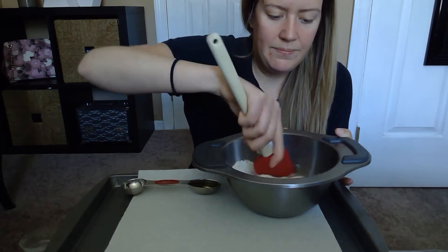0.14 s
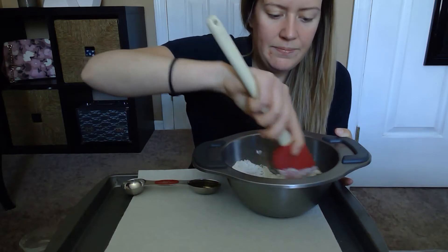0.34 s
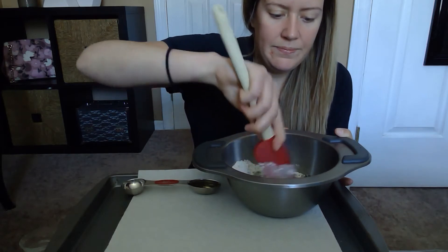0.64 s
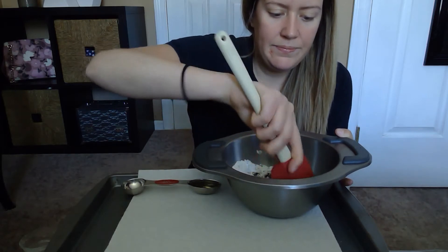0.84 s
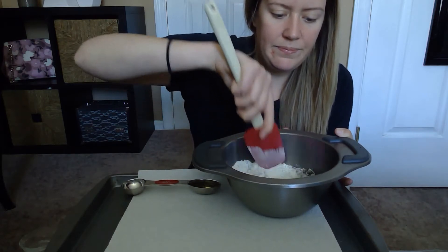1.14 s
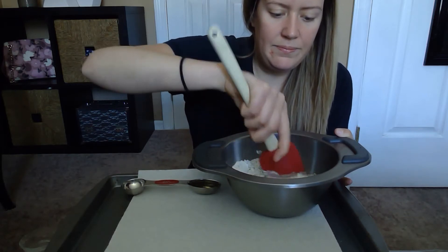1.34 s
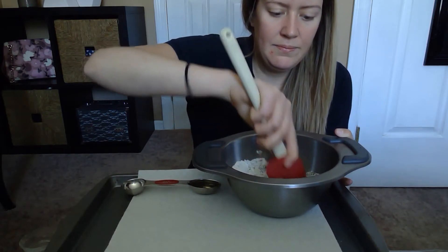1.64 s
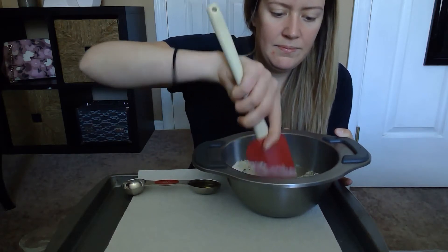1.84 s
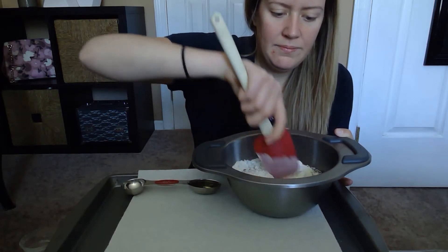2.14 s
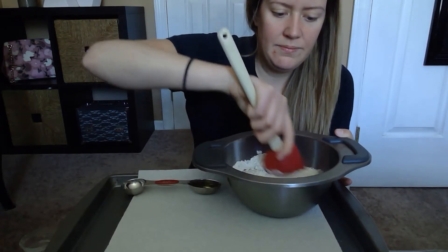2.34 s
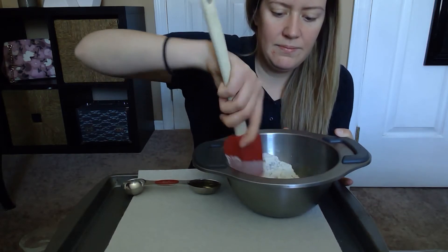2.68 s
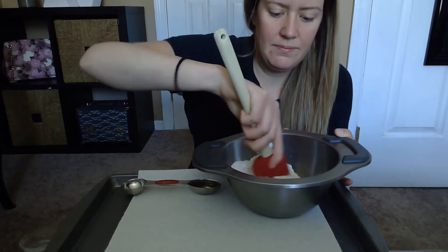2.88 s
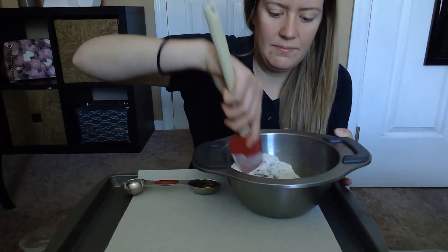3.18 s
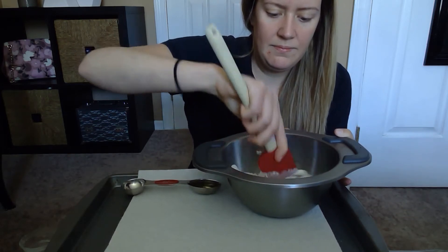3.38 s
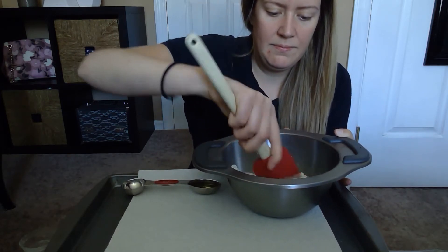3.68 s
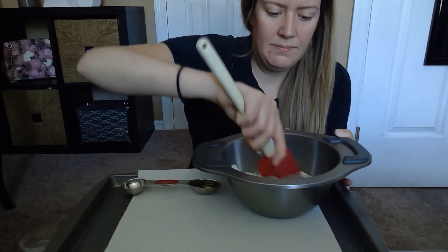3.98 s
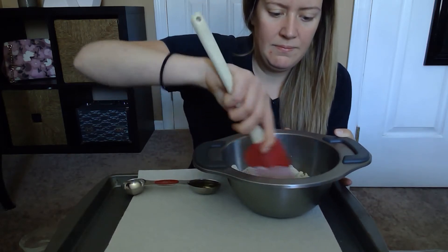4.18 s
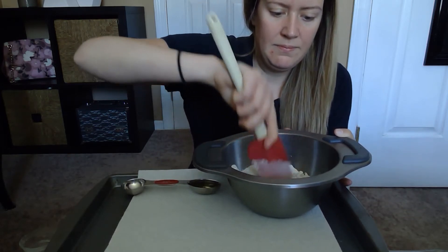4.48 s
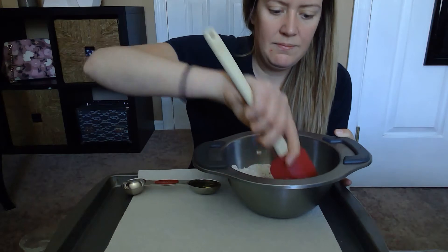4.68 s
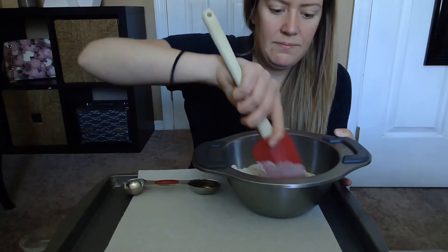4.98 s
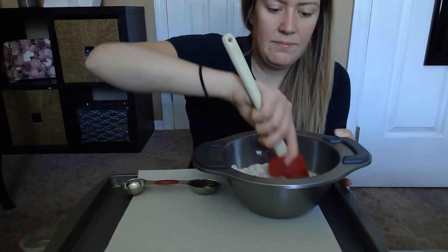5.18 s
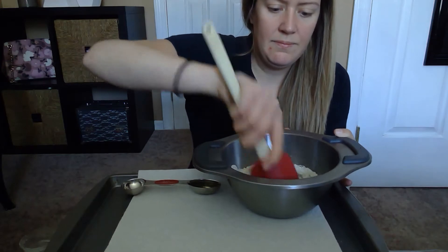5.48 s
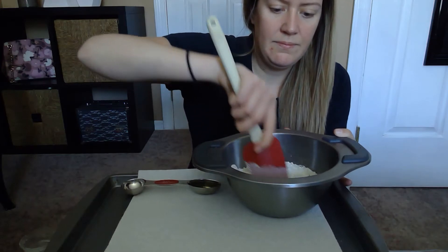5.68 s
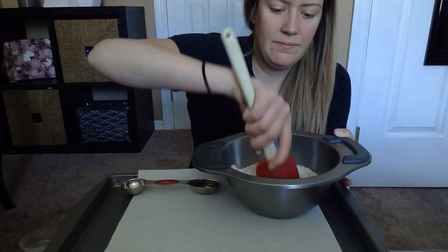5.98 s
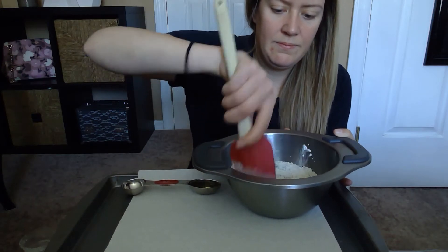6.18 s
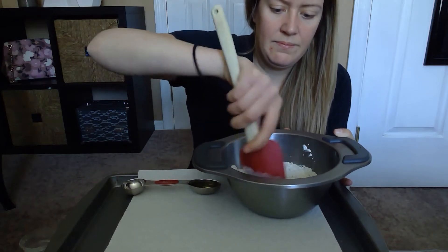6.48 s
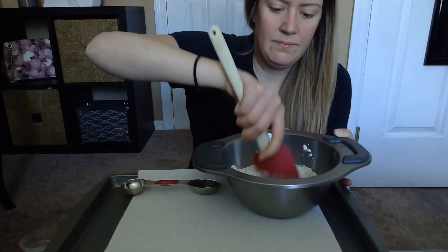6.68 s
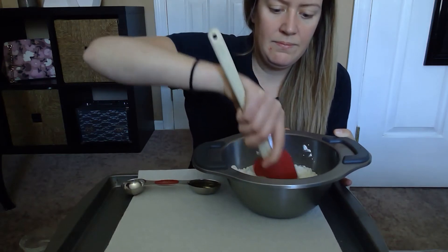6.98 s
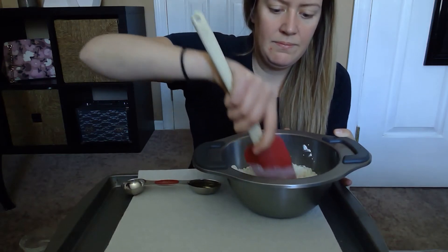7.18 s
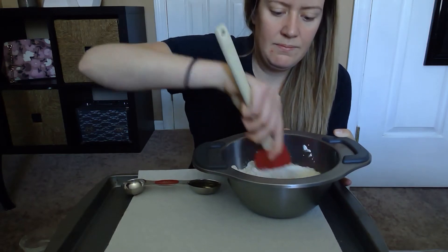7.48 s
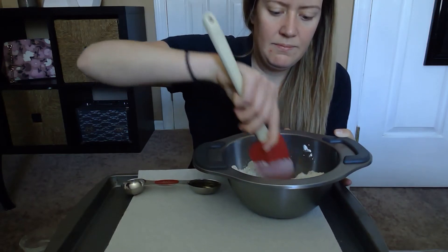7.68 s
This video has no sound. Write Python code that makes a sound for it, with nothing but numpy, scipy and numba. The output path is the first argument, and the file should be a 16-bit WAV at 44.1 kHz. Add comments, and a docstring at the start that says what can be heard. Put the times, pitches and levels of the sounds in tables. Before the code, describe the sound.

Quick, gritty stirring of a dry mix in a metal bowl, short damped knocks on its wall, and a deep constant hum indoors.

```python
"""Room air and a motor's hum run throughout; within the first seconds the motor slows and stays at the lower speed.
From the start a soft spatula stirs dry powder in a steel bowl: noise grains, shaped by each stroke, ring
steel and powder resonances as grit rubs along the wall and powder tips over itself.
Short damped rings mark the blade bumping the wall; a few dull low thumps come early and late."""
import sys
import numpy as np
from scipy import signal
from scipy.fft import rfft, irfft
from scipy.io import wavfile
from scipy.ndimage import uniform_filter1d
from numba import njit

SR = 44100
rng = np.random.default_rng(int(sys.argv[2]) if len(sys.argv) > 2 else 0)


def dump(signal):
    """Clip the signal to [-1, 1] and save it as 16-bit WAV at the path in sys.argv[1]."""
    limited = np.clip(np.atleast_2d(signal).T, -1, 1)
    pcm = np.round(limited * 32767).astype(np.int16)
    wavfile.write(sys.argv[1], SR, pcm)


N = 345303


def undb(db):
    """Amplitude ratio of a level in dB."""
    return 10 ** (np.asarray(db) / 20)


def level(x, rms_db):
    """Scale x to an rms level."""
    return x * undb(rms_db) / np.sqrt(np.mean(x ** 2))


@njit
def svf(x, hz, width):
    """State-variable band-pass with a centre that may move, gain 1 at the centre; width is a share of it."""
    y, band, low = np.empty(len(x)), 0., 0.
    for i in range(len(x)):
        g = np.tan(np.pi * hz[i % len(hz)] / SR)
        v = (band + g * (x[i] - low)) / (1 + g * (g + width))
        band, low, y[i] = 2 * v - band, low + 2 * g * v, width * v
    return y


def walk(rate_hz):
    """Random levels held 1 / rate_hz s and slewed twice; spread near 1."""
    held = np.repeat(rng.standard_normal(1024), 16)
    slewed = uniform_filter1d(uniform_filter1d(held, size=16), size=16)
    return np.interp(np.arange(N) * rate_hz / SR, np.arange(len(held)) / 16, 1.3 * slewed)


def knocks(rows, rise_s, t60_s):
    """Damped rings with a soft rise, from rows of (start_s, level_db, pitch_hz)."""
    out, t = np.zeros(N + SR), np.arange(SR // 2) / SR
    shape = (1 - np.exp(-t / rise_s)) * np.exp(-np.log(1000) * t / t60_s)
    for start_s, level_db, pitch_hz in rows:
        i = int(start_s * SR)
        out[i:i + len(t)] += undb(level_db) * shape * np.sin(2 * np.pi * pitch_hz * t)
    return out[:N]


RISE_DB = 40  # climb per rise_s up to full contact
TAIL_DB, TAIL_FADE_DB_PER_S = -23.5, 146  # quiet slower tail: level re hold, fade
DIG_RISE_S, DIG_DB, DIG_T60_S = .056, 6, .03  # a faster rise digs in: burst re hold


def force(rows, levels_db, fade_db_per_s):
    """Each contact rises, may dig in with a crisp burst, holds, fades and leaves a quiet slower tail; powers add."""
    power, lead = np.zeros(N + 2 * SR), SR // 4
    u = np.arange(-lead, 3 * lead) / SR  # s from full contact
    for (contact_s, rise_s, hold_s, *_), db in zip(rows, levels_db):
        after = np.maximum(u - max(hold_s, 0), 0)
        shape = undb(-fade_db_per_s * after) ** 2
        shape = shape + undb(TAIL_DB - TAIL_FADE_DB_PER_S * after) ** 2
        if rise_s < DIG_RISE_S:
            decay = np.exp(-2 * np.log(1000) * np.maximum(u, 0) / DIG_T60_S)
            shape = shape + undb(2 * DIG_DB) * (u >= 0) * decay
        rise = undb(db + RISE_DB * np.minimum(u, 0) / max(rise_s, 1e-3))
        i = int(contact_s * SR) + lead
        power[i:i + len(u)] += shape * rise ** 2
    return np.sqrt(power[2 * lead:2 * lead + N])


RING_T60_S = 0.044  # how long the powder lets the wall's many small modes ring


def contacts(gain, grain_db):
    """Uneven grains shift between two patches of wall; each patch rings its own thicket of modes."""
    t = np.arange(2048) / SR
    grains = rng.standard_normal(N)
    grains *= undb(grain_db * np.minimum(rng.exponential(size=N), 5))
    grains = gain * level(grains, 0)
    place = 1.57 * walk(10)
    out = 0
    for share in (np.cos(place), np.sin(place)):
        patch = rng.standard_normal(len(t)) * np.exp(-np.log(1000) * t / RING_T60_S)
        patch[0] = 12  # the first touch arrives as a tick
        patch /= np.sqrt(np.sum(patch ** 2))
        out = out + signal.oaconvolve(share * grains, patch)[:N]
    return out


def ring(x, modes, flicker_db):
    """Steep resonances, each flickering as the contact shifts; white noise comes out near rms 1."""
    out, power = 0, 0
    for k, (hz, width_hz, db) in enumerate(modes):
        hz = np.atleast_1d(1. * hz)
        share = 1.69 * width_hz / hz.mean()  # two passes narrow the band
        band = svf(svf(x, hz, share), hz, share)
        out = out + (-1) ** k * undb(db + flicker_db * walk(30)) * band
        power += undb(2 * db) * 1.9 * width_hz * np.pi / 2 / SR
    return out / np.sqrt(power)


# room air spectrum, relative: (freq_hz, density_db_per_hz)
AIR = [(10, 3.5), (25, -2.5), (60, -14), (130, -16), (170, -25.5), (240, -37.5), (330, -42), (400, -47.5),
       (520, -51), (1000, -61), (2000, -65), (8000, -72), (15600, -72)]
# dull low thumps: (start_s, level_db, pitch_hz)
THUMPS = [(1.52, -51, 163.9), (6.0, -49.5, 156.5), (6.05, -55.5, 143)]
AIR_DB = -55  # rms before the bass swells


def room():
    """Coloured air noise whose bass swells slowly, with dull thumps."""
    freq_hz, density_db = np.transpose(AIR)
    f = np.maximum(np.fft.rfftfreq(N, 1 / SR), 1)
    tilt = undb(np.interp(np.log(f), np.log(freq_hz), density_db))
    colour = rfft(rng.standard_normal(N)) * tilt * (f > 8)
    gain = undb(AIR_DB) / np.std(irfft(colour, N))
    bass = irfft(colour * (f < 600), N)
    rest = irfft(colour * (f >= 600), N)
    air = gain * (bass * undb(1.2 * walk(2.81)) + rest)
    return air + knocks(THUMPS, rise_s=0.04, t60_s=0.54)


# motor course: (time_s, shaft_hz, level_db)
MOTOR = [(0, 33.96, -49), (0.549, 34.34, -49), (0.801, 31.28, -54), (1.05, 29.48, -56), (1.303, 28.96, -53),
         (1.6, 28.69, -48.5), (4.5, 28.73, -50), (6.1, 28.52, -48.5), (6.75, 28.42, -49.5),
         (7.83, 28.9, -49)]
# multiples of the shaft speed: (order, level_db re motor)
MOTOR_ORDERS = [(.5, -6.5), (1, 0), (2, -8.5), (3, -17.5), (4, -30)]
# standing wave that lifts the hum: (mode_hz, width_hz, lift_db)
ROOM_MODE = (114, 5.7, 24.96)
# thin tone: (pitch_hz, level_db)
WHINE = (443, -89)
ORDER_WAVER_DB, WHINE_WAVER_DB = 0.88, 3.5


def hum():
    """Shaft orders waver a little, the order on the room mode swells; a thin whine comes and goes."""
    time_s, *columns = np.transpose(MOTOR)
    t = np.arange(N) / SR
    shaft_hz, motor_db = (np.interp(t, time_s, c) for c in columns)
    phase = 2 * np.pi * np.cumsum(shaft_hz) / SR
    mode_hz, width_hz, lift_db = ROOM_MODE
    orders = 0
    for k, order_db in MOTOR_ORDERS:
        lift = 1 + undb(lift_db) / (1 + ((k * shaft_hz - mode_hz) / width_hz) ** 4)
        gain = undb(motor_db + order_db + ORDER_WAVER_DB * walk(1.6)) * lift
        orders = orders + gain * np.sin(k * phase + rng.uniform(0, 2 * np.pi))
    whine_hz, whine_db = WHINE
    whine = undb(whine_db + WHINE_WAVER_DB * walk(3.1)) * np.sin(2 * np.pi * whine_hz * t)
    return np.sqrt(2) * (orders + whine)  # levels are rms


# blade bumps: (start_s, level_db, pitch_hz)
BUMPS = [(0.132, -41.5, 760), (0.394, -46, 503), (0.494, -57, 786), (0.894, -46, 593), (1.258, -48.5, 650),
         (1.645, -36, 580), (1.964, -46.5, 710), (2.049, -49, 620), (2.344, -54, 600), (2.375, -41, 654),
         (3.255, -51.5, 730), (3.31, -42.5, 720), (4.031, -51.5, 460.7), (4.468, -51, 897),
         (4.779, -48.5, 660), (5.189, -33, 650), (5.204, -40, 610), (5.593, -38, 683), (5.898, -42.5, 737),
         (6.003, -36, 763), (6.049, -49, 638), (6.363, -47, 612), (6.679, -58, 605), (6.699, -55.5, 725),
         (7.104, -43, 712), (7.531, -46, 759)]
THUD_HZ, THUD_DB = 291, -14  # level re bump
TICK_HZ, TICK_DB = 1800, -12  # level re bump


def bumps():
    """Powder damps the bowl, so a bump is a few cycles, a neighbour mode, a tick and a low thud."""
    upper = [(s, db - 7.0, 1.14 * hz) for s, db, hz in BUMPS]
    thud = [(s, db + THUD_DB, THUD_HZ) for s, db, _ in BUMPS]
    tick = [(s, db + TICK_DB, TICK_HZ) for s, db, _ in BUMPS]
    return (knocks(BUMPS, rise_s=0.002, t60_s=0.037) + knocks(upper, rise_s=0.0024, t60_s=0.026)
            + knocks(thud, rise_s=0.0037, t60_s=0.039) + knocks(tick, rise_s=0.00033, t60_s=0.02))


# blade scrapes grit along the wall: (contact_s, rise_s, hold_s, grit_db, boom_re_grit_db,
# wall_re_grit_db, sift_re_grit_db, dust_re_grit_db, rasp_hz)
SCRAPES = [(0.134, 0.035, 0.027, -67.5, 6, 8, 1.5, 5.0, 3000),
           (0.216, 0.057, 0, -53.5, -9, -2.5, -4, -3, 4300),
           (0.393, 0.023, 0.015, -96.5, 26.5, 21, 7, -4, 3500),
           (0.493, 0.056, 0.02, -64.5, 5.0, 1.5, 5.5, 7, 3110.0),
           (0.588, 0.082, 0.0076, -59, -7, 1.5, -5, -2, 3260),
           (0.835, 0.062, 0.052, -61, -3.0, -8, 7.5, 1.5, 2815),
           (0.872, 0.067, 0.049, -65.5, 5, 4.5, 0.0, 5, 3230),
           (1.261, 0.034, 0.055, -58.5, -3, 2.5, -6, 1.5, 2783),
           (1.643, 0.032, 0.011, -60.5, 8.5, 4.5, -21.0, 5, 3350),
           (1.956, 0.036, 0.062, -63, -7.5, -6, 6.5, -1.5, 3180),
           (2.011, 0.11, 0.035, -60, 0, 3, 1.5, -2, 3340),
           (2.35, 0.048, 0.083, -65.5, 2.5, 7, 5, 3.5, 3333),
           (2.899, 0.13, 0.046, -76.5, -14.5, 7, 2.5, 5.5, 3734),
           (2.943, 0.037, 0.016, -59.5, -6.5, 1, -5.5, -2.5, 4065),
           (3.262, 0.056, 0.086, -73.5, 10.5, 5, 6, 8.5, 3047),
           (3.384, 0.13, 0.013, -55, -9.5, -4.5, -8.5, -5.5, 3500),
           (4.047, 0.091, 0.031, -70, -10, -4, -2.5, -1.5, 3500.0),
           (4.402, 0.067, 0.049, -83.5, -2, 8, 9.5, 14.0, 3880),
           (4.444, 0.038, 0.026, -56.5, -9.5, -0.5, -9, -6.5, 3830),
           (4.696, 0.035, 0.08, -56.5, -1.5, 0.5, 5, -2.0, 3304),
           (4.835, 0.1, 0.03, -61, -10, -2.5, -6, -2, 3329),
           (5.124, 0.027, 0.032, -68.5, 1, 3.5, 15.5, 2, 3260),
           (5.176, 0.074, 0.042, -65.5, 10.5, 6.0, -2, 6, 3427),
           (5.23, 0.015, 0.039, -70, -24.5, -1.5, 2.0, 4, 3820),
           (5.504, 0.022, 0.077, -60.5, 3.5, 1.5, 9.5, -3, 3375),
           (5.578, 0.0064, 0.03, -61.5, 2, 4.5, -26.5, -4, 3330),
           (5.637, 0.033, 0.022, -73, -20.5, -1.5, -0.5, 2.0, 3380),
           (5.901, 0.033, 0.046, -59, -5.5, -3, 5.5, -7, 3440),
           (5.993, 0.037, 0.005, -55.5, -0.5, 1, -2, -3.5, 2890),
           (6.051, 0.006, 0, -68.5, 7, 7.5, 1.5, 2.5, 3100),
           (6.225, 0.015, 0.013, -78, 7, 5, -16, -22.5, 2840),
           (6.255, 0.042, 0.075, -59.5, -22, -10.5, 4, -2, 3590.0),
           (6.353, 0.044, 0.0067, -59.5, 4, 7.5, 1, -2.5, 4110.0),
           (6.412, 0.008, 0.001, -75.5, 2, 2, 4, -5, 3300),
           (6.587, 0.025, 0.016, -77.5, 2.5, -0.5, 13, -6.5, 2880),
           (6.676, 0.024, 0.0056, -65.5, -8.5, -0.5, -8, -1, 2870),
           (6.696, 0.0071, 0.0005, -67.5, 1.5, 5, 1, -7.5, 3245),
           (7.055, 0.07, 0.014, -67.5, -32, -7, 7, 3, 3814),
           (7.1, 0.099, 0, -55.5, -4, -1.5, -5, -6.5, 4060),
           (7.488, 0.031, 0.062, -61.0, -3.5, 3.5, -3.5, 8, 3350.0),
           (7.608, 0.14, 0, -58, -3.5, 3, 1.5, 2.5, 3740)]
_, _, _, GRIT_DB, BOOM_RE_DB, WALL_RE_DB, SIFT_RE_DB, DUST_RE_DB, _ = np.transpose(SCRAPES)
SOFT_FADE_DB_PER_S = 380  # rubs and trickles


def scrape_force(re_grit_db, fade_db_per_s):
    """Drive of the scrapes on one part of the sound, set relative to their grit."""
    return force(SCRAPES, GRIT_DB + re_grit_db, fade_db_per_s)


# powder slips off the blade: (full_flow_s, rise_s, hold_s, sift_db, dust_re_sift_db, low_re_high_db)
TRICKLES = [(0.41, 0.014, 0.001, -65, -22, 21), (0.473, 0.065, 0.064, -61, -5, -16),
            (0.954, 0.147, 0.037, -71.5, 6, -8), (1.223, 0.023, 0.0, -71, -6, 1),
            (1.335, 0.044, 0.048, -67, 2, -7.0), (1.453, 0.039, 0.027, -80.5, -14.0, 4),
            (1.633, 0.037, 0.013, -53, -1.5, -7.5), (2.105, 0.17, 0, -68.5, 2, -18),
            (2.246, 0.039, 0, -78, -16, 1.0), (2.278, 0.007, 0.0079, -79.5, -18, 4.0),
            (2.425, 0.0051, 0.11, -61, 1.5, 0), (2.552, 0.08, 0.11, -76, -10, -5.5),
            (2.757, 0.0093, 0.0061, -93, -11, 0), (3.028, 0.014, 0.015, -87.5, -7, -11.0),
            (3.235, 0.023, 0.062, -77, -25, -12), (3.487, 0.026, 0.001, -85, -12, -17.0),
            (3.829, 0.027, 0.06, -84, -5.5, 4.0), (3.93, 0.066, 0.032, -83, -20, 18),
            (4.313, 0.022, 0.0044, -88.5, -17.5, -9), (5.881, 0.013, 0.0, -70, -20.0, 0.0),
            (6.175, 0.029, 0.024, -80, -22, 19), (6.43, 0.0063, 0.09, -80.5, -5.5, -21),
            (7.19, 0.17, 0, -69.5, -10.0, -4), (7.453, 0.051, 0.05, -73, -8.0, -7)]
# sifting resonances: (freq_hz, width_hz, level_db)
SIFT_MODES = [(7927, 460, 0.5), (9330, 640, -2), (10310, 720, -0.5), (10930, 2400, -11)]
# hiss of the finest dust: (freq_hz, width_hz, level_db)
DUST_MODES = [(13550, 14000, 0)]
SIFT_LOW_DB, SIFT_HIGH_DB = -5.5, -2.13  # a scrape's sifting: lowest resonance, higher ones
SIFT_FLICKER_DB = 1.8


def sifting(slip):
    """Scraped and trickling powder rings treble resonances and hisses as fine dust."""
    *_, trickle_db, dust_re_db, tilt_db = np.transpose(TRICKLES)
    low_db = trickle_db - 10 * np.log10(1 + undb(-2 * tilt_db))
    high_db = trickle_db - 10 * np.log10(1 + undb(2 * tilt_db))
    sifted = scrape_force(SIFT_RE_DB, 470)
    low = np.hypot(undb(SIFT_LOW_DB) * sifted, force(TRICKLES, low_db, SOFT_FADE_DB_PER_S))
    high = np.hypot(undb(SIFT_HIGH_DB) * sifted, force(TRICKLES, high_db, SOFT_FADE_DB_PER_S))
    trickled_dust = force(TRICKLES, trickle_db + dust_re_db, SOFT_FADE_DB_PER_S)
    dust = np.hypot(scrape_force(DUST_RE_DB, 430), trickled_dust)
    return (ring(contacts(slip * low, 1.4), SIFT_MODES[:1], SIFT_FLICKER_DB)
            + ring(contacts(slip * high, 2.1), SIFT_MODES[1:], SIFT_FLICKER_DB)
            + ring(contacts(slip * dust, 2.5), DUST_MODES, 1.8))


# blade slides softly along the wall: (contact_s, rise_s, hold_s, boom_db, wall_re_boom_db)
RUBS = [(1.14, 0.017, 0.02, -93.5, -8.5), (1.603, 0.079, 0.023, -81, 0), (2.811, 0.084, 0.097, -70.5, -8.5),
        (3.724, 0.012, 0.098, -89, -24), (3.98, 0.024, 0.072, -69.5, -7), (4.156, 0.018, 0.021, -103.5, 15),
        (4.249, 0.019, 0.18, -76, -18.5), (6.929, 0.021, 0.096, -73.5, -33)]
# low bowl resonances: (freq_hz, width_hz, level_db)
BOOM_MODES = [(307, 170, -6), (504, 68, -6), (612.4, 83, 1), (768, 88, -0.5), (948, 160, -5.5),
              (1178, 150, -13.5)]
# middle wall resonances: (freq_hz, width_hz, level_db)
WALL_MODES = [(1400, 133, -1.8), (1618, 138, 4.3), (2026, 290, 0.38)]
WALL_DRIFT = .04  # share of the frequency, as the powder shifts


def bowl(slip):
    """Rubs and scrapes drive the bowl's low boom and its wandering wall resonances."""
    *_, rub_db, rub_wall_db = np.transpose(RUBS)
    rub = force(RUBS, rub_db, SOFT_FADE_DB_PER_S)
    rub_wall = force(RUBS, rub_db + rub_wall_db, SOFT_FADE_DB_PER_S)
    boom = scrape_force(BOOM_RE_DB, 315)
    wall = np.hypot(scrape_force(WALL_RE_DB, 454), rub_wall)
    wall_modes = [(hz * (1 + WALL_DRIFT * walk(5)), width_hz, db) for hz, width_hz, db in WALL_MODES]
    return (ring(contacts(slip * rub, 3.1), BOOM_MODES[:4], 1.8)  # too soft for the top modes
            + ring(contacts(slip * boom, 3.4), BOOM_MODES, 2.9)
            + ring(contacts(slip * wall, 3.3), wall_modes, 2.68))


# grit resonances: (freq_hz, width_hz, level_db)
GRIT_MODES = [(2440, 345, 0.5), (5000, 3100, -22.5), (6660, 5000, -13.5)]
RASP_WIDTH, RASP_DB = 0.46, 0.5  # width as a share of the mean centre
BODY_HZ, BODY_WIDTH_HZ, BODY_DB = 278, 194, -16  # level re grit


def grit(slip):
    """Grit scraped on steel: fixed bands, a rasp that moves with the strokes, the whole bowl thrumming."""
    contact_s, _, hold_s, *_, stroke_hz = np.transpose(SCRAPES)
    rasp_hz = np.interp(np.arange(N) / SR, contact_s + hold_s / 2, stroke_hz)
    rasp = (rasp_hz, RASP_WIDTH * rasp_hz.mean(), RASP_DB)
    touch = contacts(slip * scrape_force(0, 463), 2.8)
    bands = ring(touch, GRIT_MODES + [rasp], 1.44)
    body = ring(touch, [(BODY_HZ, BODY_WIDTH_HZ, 0)], 3.3)
    return bands + undb(BODY_DB) * body


SLIP_DB = 2.2  # how unevenly the blade sticks and slips


def stirring():
    """One uneven stick-slip of the blade modulates grit, bowl and sifting alike."""
    slip = undb(SLIP_DB * walk(60))
    return grit(slip) + bowl(slip) + sifting(slip)


def scene():
    """Sum of all sources, one channel."""
    return (stirring() + bumps() + hum() + room())[None, :]


TOP_HZ = 15620


def record(dry):
    """Steep elliptic low-pass cuts the top."""
    return signal.sosfilt(signal.ellip(10, .2, 70, TOP_HZ, fs=SR, output="sos"), dry)


dry = scene()
out = record(dry)
dump(out)
```